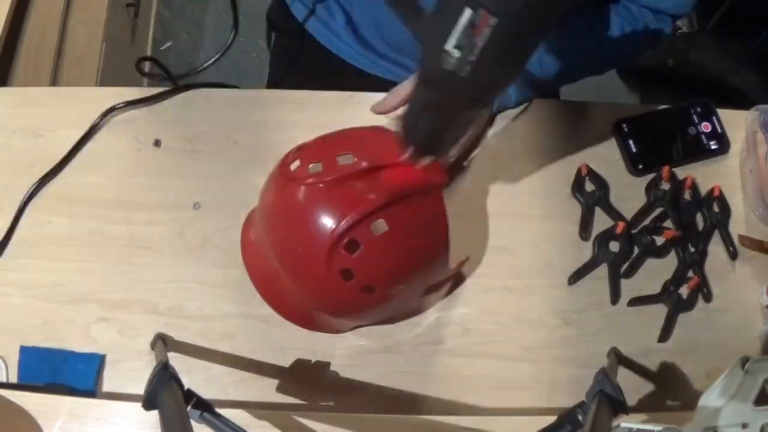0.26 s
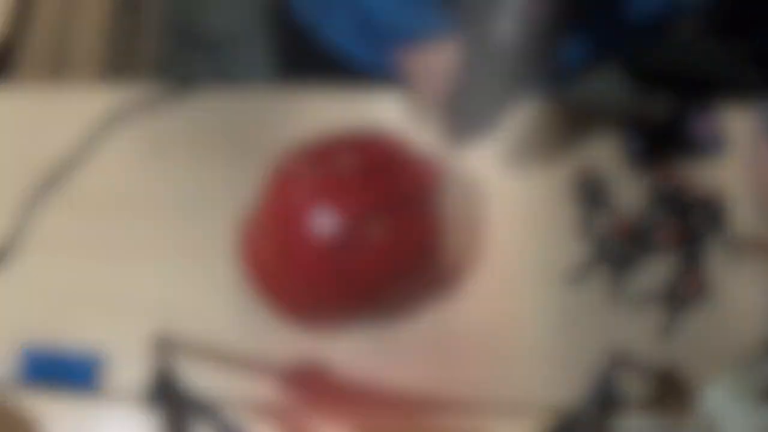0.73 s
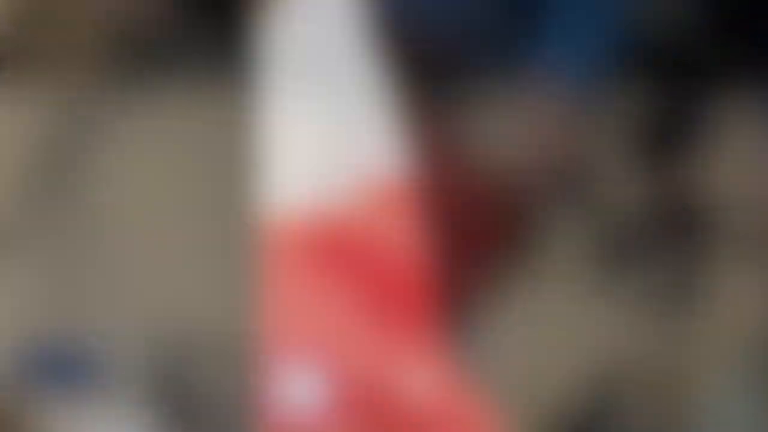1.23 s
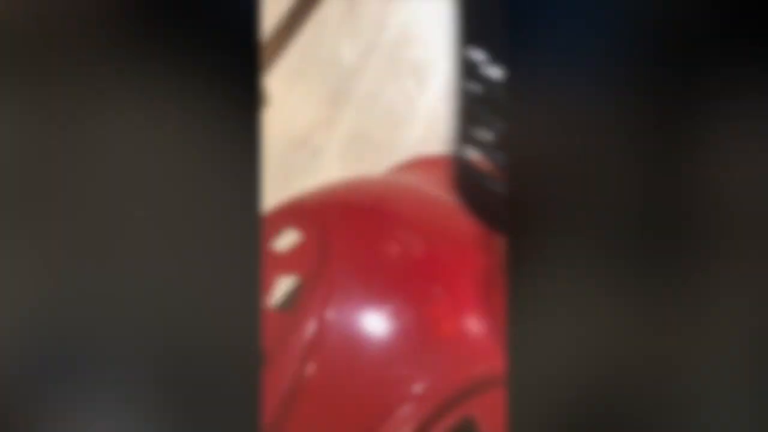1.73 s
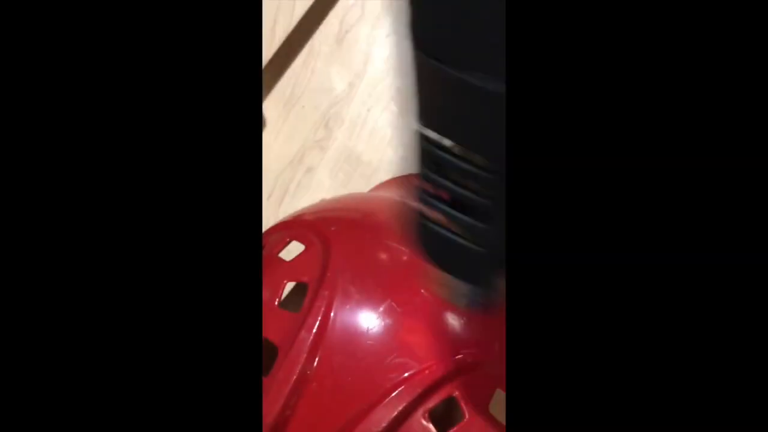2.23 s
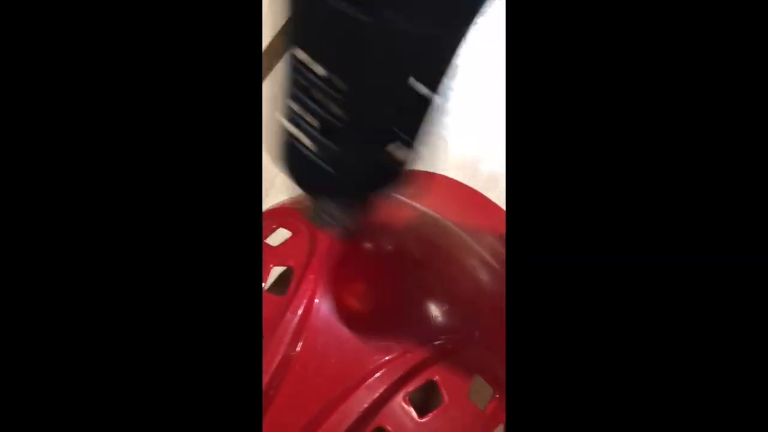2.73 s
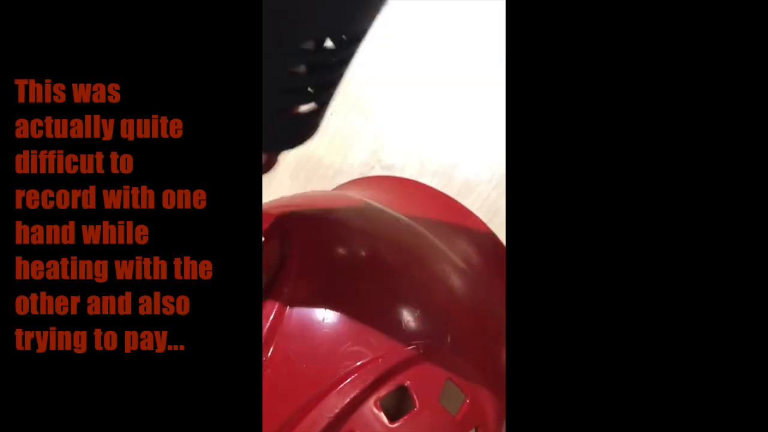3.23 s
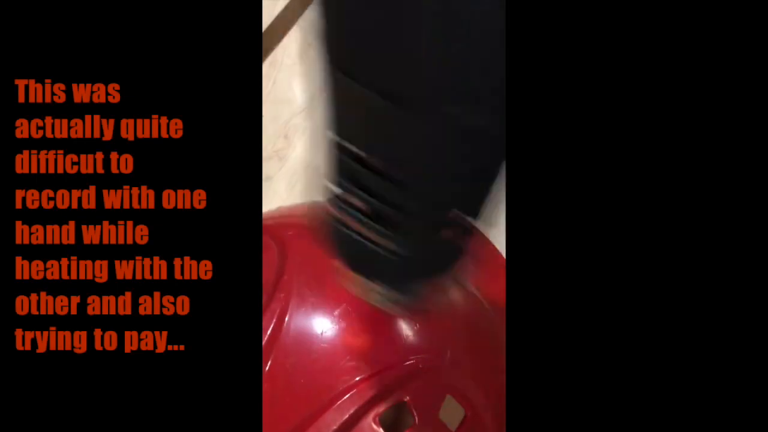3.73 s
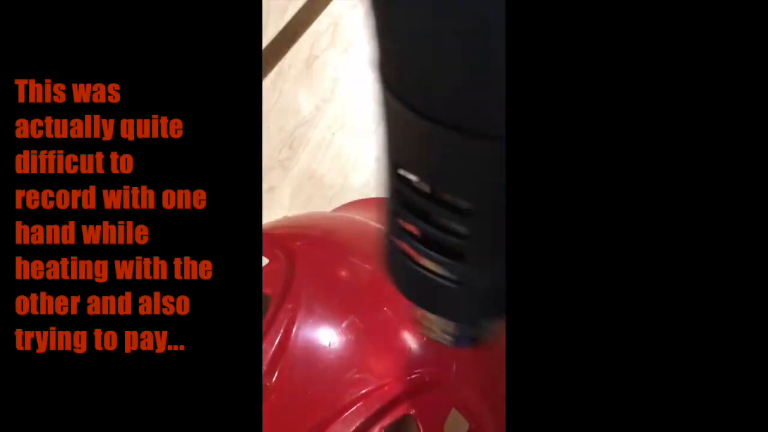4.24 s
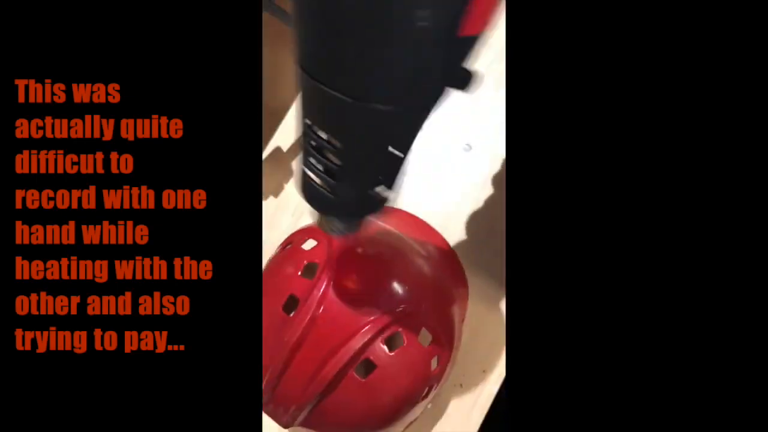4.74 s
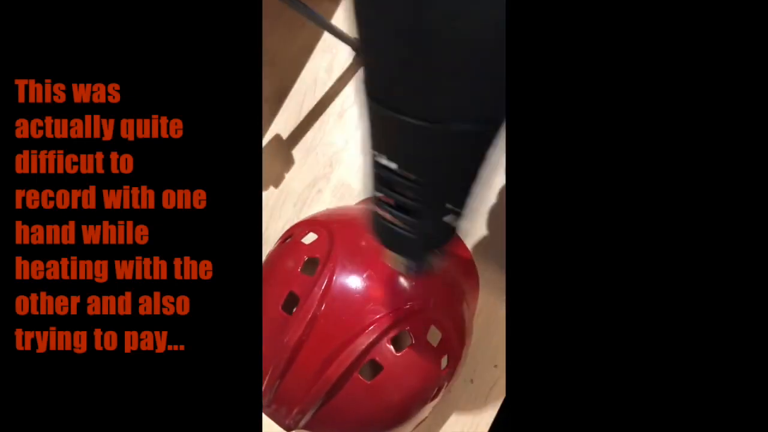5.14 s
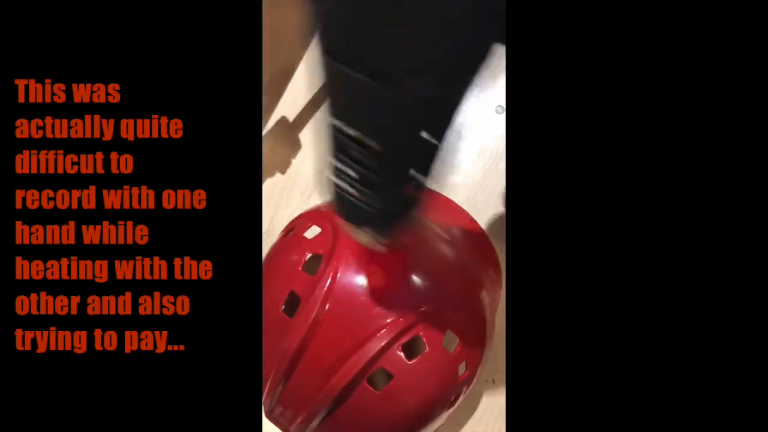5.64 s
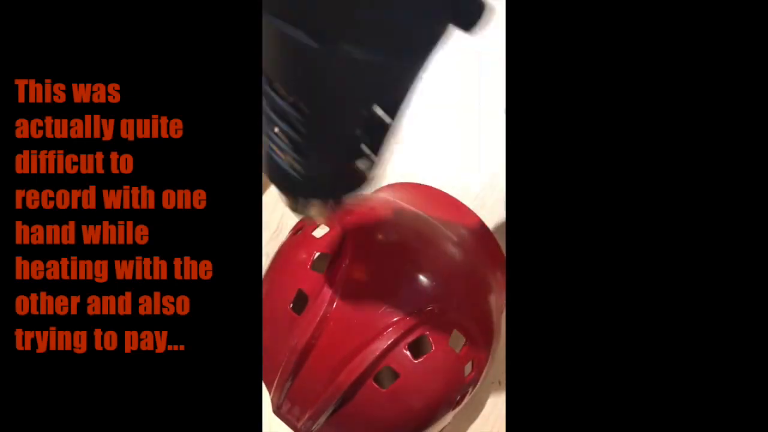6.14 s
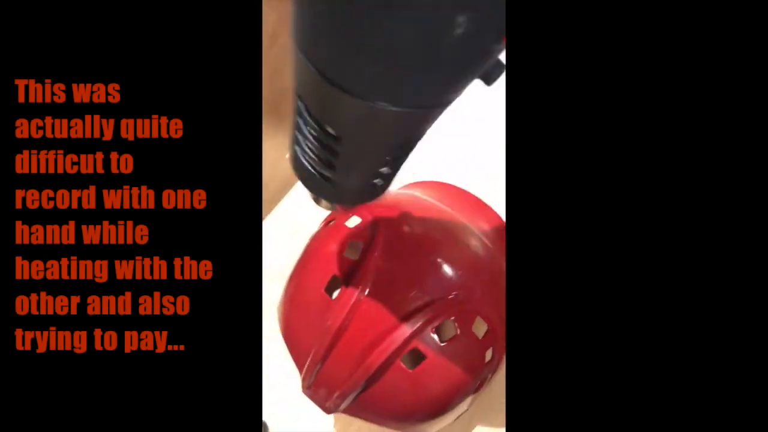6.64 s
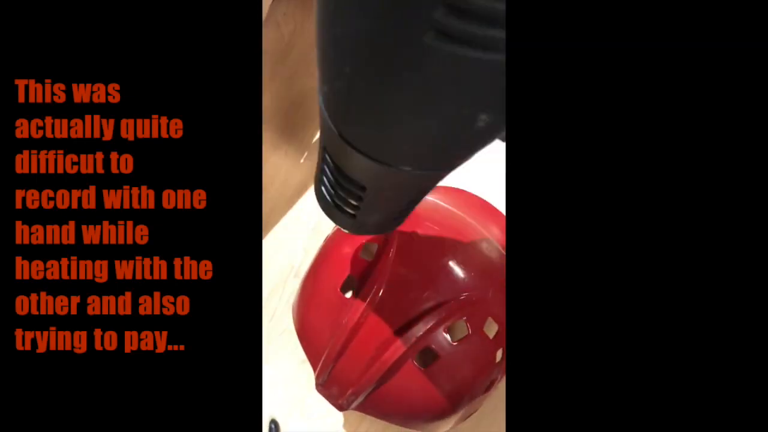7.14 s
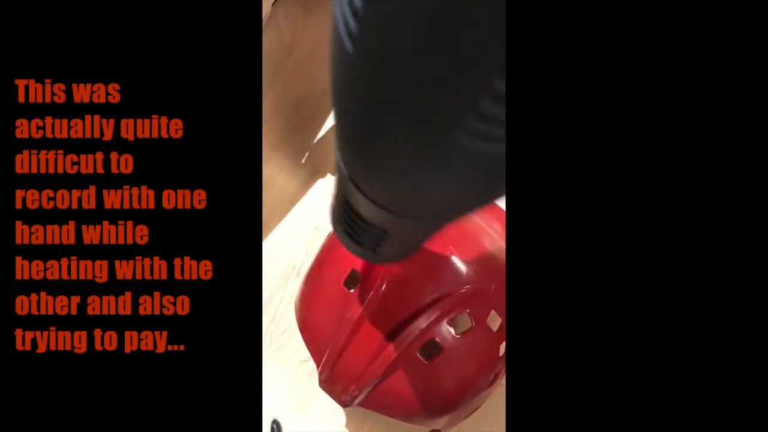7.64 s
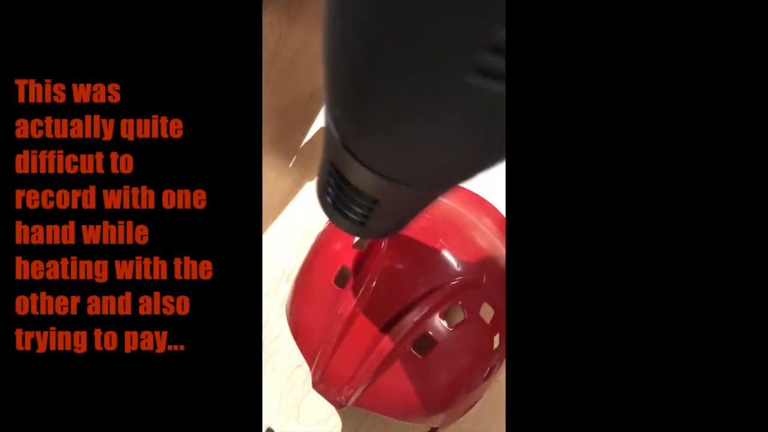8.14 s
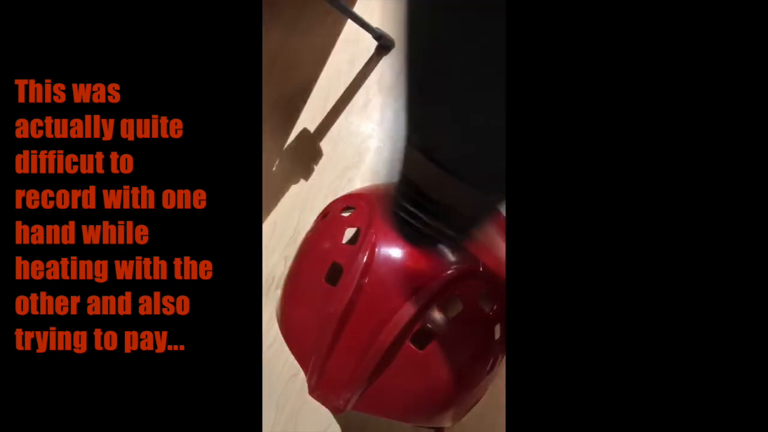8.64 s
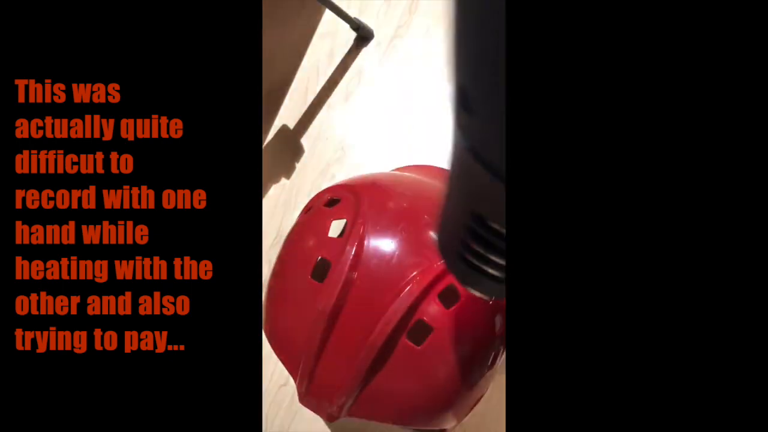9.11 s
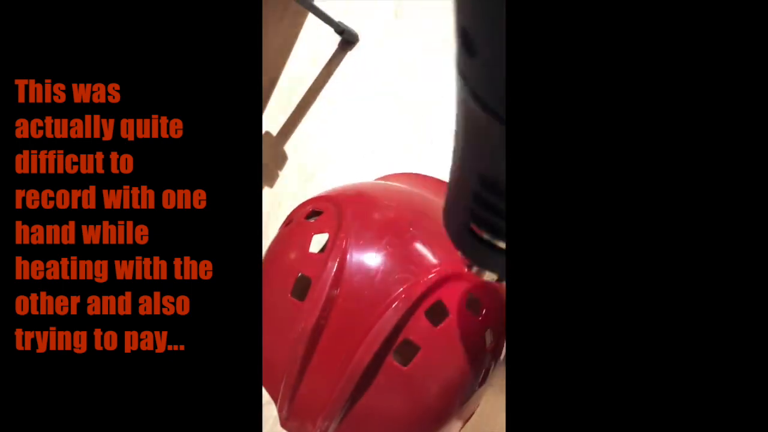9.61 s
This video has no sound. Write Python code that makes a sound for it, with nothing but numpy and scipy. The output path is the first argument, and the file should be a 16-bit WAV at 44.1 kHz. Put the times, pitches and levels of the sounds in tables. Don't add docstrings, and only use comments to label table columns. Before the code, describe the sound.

Sped-up airy hissing gives way to a heat gun blowing up close, its motor hum and rushing air wavering gently over plastic.

```python
import sys
import numpy as np
from scipy import signal
from scipy.io import wavfile
from scipy.ndimage import uniform_filter1d

SR = 44100
rng = np.random.default_rng(int(sys.argv[2]) if len(sys.argv) > 2 else 0)


def gain_from_db(level_db):
    decades = np.asarray(level_db, float) / 20
    return 10 ** decades


def unload_wav(signal):
    wavfile.write(
        sys.argv[1],
        SR,
        np.round(np.clip(np.atleast_2d(signal).T, -1, 1) * 32767).astype(np.int16),
    )


N = 435266

# time in seconds, distance, tilt, turn, aim (jet square on the shell)
POSE = [(1.51, 0.58, -0.65, .99, -1.6), (2.21, 0.59, 0.22, 0.11, 0.22), (2.91, 0.86, 0.31, 0.046, -0.29),
        (3.61, 0.61, 0.087, -0.0093, .1), (3.96, 0.61, 0.37, -0.19, -0.014),
        (4.66, 0.58, -0.26, 0.049, 0.071), (5.36, 0.45, -0.44, 0.078, 0.18), (5.71, 0.15, -0.65, 0.026, .3),
        (6.06, 0.081, -1.04, -.01, 0.61), (6.76, -.12, -0.26, -0.69, 0.28),
        (7.11, -0.27, 0.041, -0.49, .65), (7.46, -.69, 0.45, -0.17, .99), (8.16, -0.71, 0.21, -0.25, .99),
        (8.51, -0.8, 0.36, .21, .8), (8.86, -0.21, -0.72, -0.13, -0.63), (9.21, -0.54, -0.92, -0.15, -0.95),
        (9.86, -0.012, -1.24, 0.15, -0.8)]
# time in seconds, swings done, shaft speed in Hz, pitch bend of the swing in Hz.
WAVING = [(0, -1, 207.6, 0), (.75, -1, 207.55, .05), (1.01, 0, 207.75, .35), (1.55, 2, 207.5, .48),
          (2.05, 4, 207.62, .35), (2.58, 6, 207.6, .44), (3.14, 8, 207.67, .47), (3.7, 10, 207.67, .44),
          (4.26, 12, 207.75, .32), (4.72, 14, 207.83, .15), (5.48, 17, 207.84, .33), (6.28, 20, 207.98, .4),
          (6.81, 22, 207.87, .25), (7.55, 25, 208.05, .25), (8.31, 28, 208.27, .17), (8.84, 30, 208.32, .3),
          (9.36, 32, 208.4, .26), (9.87, 34, 208.3, .25)]


def evened(x):
    return x / np.sqrt(np.mean(x ** 2) + 1e-20)


def read(points, hz):
    f, value = np.transpose(points)
    return np.interp(np.log(hz + 1), np.log(f + 1), value)


def curve(rows, t):
    s, *columns = np.transpose(rows)
    return np.array([np.interp(t, s, c) for c in columns])


def drift(count, t, top_hz):
    hz = np.geomspace(top_hz / 20, top_hz, 16)
    phase = rng.random((count, 16, 1))
    waves = np.sin(2 * np.pi * (hz[:, None] * t + phase))
    return evened((waves / np.sqrt(hz)[:, None]).sum(1))


def noise(spectrum, change_db, patchy_db, size=N):
    window, hop = 1024, 256
    t = np.arange(size // hop + 5) * hop / SR
    hz = np.fft.rfftfreq(window, 1 / SR)
    real, imag, patches = rng.standard_normal((len(t), len(hz), 3)).T
    patches = uniform_filter1d(patches, size=10, axis=0)
    patches = evened(uniform_filter1d(patches, size=10, axis=1))
    shape = gain_from_db(read(spectrum, hz)[:, None] + patchy_db * patches)
    shape = shape / np.sqrt(np.mean(shape ** 2))
    z = (real + 1j * imag) * shape * gain_from_db(change_db(hz, t))
    return signal.istft(z, nperseg=window, noverlap=window - hop)[1][:size] / 15


def crossed(t):
    start_s, length_s = 0.26, 1.55
    return np.sin(np.pi / 2 * np.clip((t - start_s) / length_s, 0, 1)) ** 2


def tick(start_s, peak_db, length_s, centre_hz, width_hz):
    lead_s = start_s % .01
    t = np.arange(N // 20 + 2000) / SR - lead_s
    edges_hz = [max(centre_hz - width_hz / 2, 300), centre_hz + width_hz / 2]
    band = signal.butter(2, edges_hz, "bandpass", fs=SR, output="sos")
    rattle = evened(signal.sosfilt(band, rng.standard_normal(len(t))))
    attack = np.clip(t / 0.00022, 0, 1)
    decay = np.exp(-(np.maximum(t, 0) / length_s) ** 3)
    knock = gain_from_db(peak_db) / 2 * rattle * attack * decay
    return np.pad(knock, (round((start_s - lead_s) * SR), N))[:N]


def fast_view():
    # frequency in Hz, level in dB per Hz.
    air_spectrum = [(15, -47), (40, -18), (800, -16.5), (1800, -11.5), (2400, -15.5), (3800, -12.5),
                    (5000, -14.5), (8800, -11), (9500, -6), (11000, -3.5), (11800, -9), (12300, -3),
                    (14000, -3.5), (15700, -4)]
    # frequency in Hz, side minus mid in dB.
    side_spectrum = [(60, -15), (110, -9), (200, -14), (380, -12), (700, -13), (1290, -16), (2380, -31),
                     (4400, -28), (8120, -22), (15000, -24)]
    # frequency in Hz, level in dB.
    whistle_rows = [(2756, -71), (5512, -73), (8210, -73), (8269, -72), (10955, -70), (11020, -64),
                    (11149, -71), (12160, -68), (12236, -64), (12705, -70), (13779, -59.5), (14890, -67),
                    (14933, -63), (14971, -69)]
    # start in seconds, peak in dB, length in seconds, centre in Hz, width in Hz.
    tick_rows = [
        (.213, -43, .009, 4500, 6000),
        (.214, -38, .009, 6700, 600),
        (.241, -41, .007, 2000, 900),
        (.243, -43, .005, 3700, 1200),
        (.4723, -38, .007, 3200, 900),
        (.4723, -43, .007, 2000, 900),
        (.4723, -35, .007, 5400, 1100),
        (.4723, -37, .006, 7700, 1200),
    ]
    view_db, tick_side_db = -46, -7
    t = np.arange(2 * SR) / SR
    left_right = np.array([[1], [-1]])

    air = noise(air_spectrum, lambda hz, s: 0 * s, patchy_db=1.4, size=len(t))
    side = noise(air_spectrum, lambda hz, s: read(side_spectrum, hz)[:, None], patchy_db=4.5, size=len(t))

    wobble = drift(1, t, top_hz=25.2)[0]
    swells = drift(len(whistle_rows), t, top_hz=30.2)
    warped_s = np.cumsum(1 + .0003 * wobble) / SR
    whistles = np.zeros(len(t))
    for (hz, db), swell in zip(whistle_rows, swells):
        whistles += gain_from_db(db + 51.5 + 1.5 * swell) * np.sin(2 * np.pi * hz * warped_s)

    blown = gain_from_db(view_db) * (1 - crossed(t)) * (air + whistles + side * left_right)
    blown = np.pad(blown, ((0, 0), (0, N - len(t))))
    mid_ticks = sum(tick(*row) for row in tick_rows)
    side_ticks = sum(tick(*row) for row in tick_rows)
    return blown + mid_ticks + gain_from_db(tick_side_db) * side_ticks * left_right


def shaft_hz(t):
    swings, hz, bend_hz = curve(WAVING, t)
    return hz + bend_hz * np.cos(2 * np.pi * swings)


def swing(t):
    swings, hz, bend_hz = curve(WAVING, t)
    return np.minimum(10 * bend_hz, 1) * np.exp(2j * np.pi * swings)


def motor(turns):
    strong_orders = [1, 3, 4, 5, 6, 7, 8, 9, 10, 11, 12, 13, 15, 16, 19, 21, 22, 24, 25, 30, 34, 35, 36, 37,
                     43, 44, 45, 47, 51, 71]
    # dB at rest, dB per distance, dB per tilt, dB per turn.
    strong_levels = np.array([(-53, -3.6, -1.5, 0.2), (-58.5, 1.5, -1.2, -1.5), (-56, -4.5, -2.5, -7),
                              (-51, -2.5, 1.5, -1), (-45.5, -1.1, 1.4, 0), (-55.5, 0.5, 0, -0.5),
                              (-57.5, -5, 0.5, 2), (-58.5, -5, -4.5, 3.5), (-67.5, -1, -20, -6.0),
                              (-51, -1, -2.5, -4), (-50.5, 3.0, -3.5, -4), (-60, 1, 1, -11),
                              (-68, -16, 7, 10), (-65.5, 3.4, -4, -5.5), (-73, -22.2, -11, 15.0),
                              (-64, -5, -2, 4.5), (-67, -15, 12, -4.0), (-67, -3.0, -2, -3),
                              (-69, 3, 2, -7), (-66.5, -5, 3, -7.0), (-67, -2, -1.6, 2),
                              (-62.5, 7.5, -6.5, -8), (-74, -1, -3, 9), (-64, 2, 0.1, -6),
                              (-76.5, -7, 6, -14), (-62.3, -0.5, 0.5, -6), (-67, 6.5, 14, -2.6),
                              (-72, 3.5, 8, -10), (-59, -1, -1, -2.1), (-67, 3, 1.8, -7)])
    # dB with swing speed, dB with swing position.
    strong_throb = np.array([(.2, .1), (-.5, -.5), (.3, 1.8), (-.3, .7), (-.1, .9), (-.8, .2), (-1.1, .7),
                             (1.3, 1.8), (1.1, 2.6), (-1.3, 3.1), (1.2, 0), (-4.1, 4.1), (-.3, 1.3),
                             (3.6, .2), (.2, .3), (-1.6, -2.1), (-4.2, -3), (-1, -3), (-4, -.5), (-2, .5),
                             (-3.5, -1), (.4, -1.1), (-2.2, -2.4), (-2.4, -2.1), (0, -2.5), (3.2, -.8),
                             (-3.4, -1.8), (-1, -4.5), (.3, .5), (-.8, .2)])
    # frequency in Hz, level in dB.
    weak_spectrum = [(400, -75), (2900, -72), (3700, -68), (4800, -72), (5500, -71), (6600, -77),
                     (8100, -70), (8600, -75), (10200, -71), (11500, -74), (14000, -75.5), (15600, -79)]
    # multiple, change in dB.
    shaded_orders = [(12, -2), (47, 4), (49, 4), (50, 2), (51, -8)]
    t = np.arange(0, N / SR, .01)
    wave, pose = swing(t), curve(POSE, t)
    distance, aim = pose[0], pose[3]
    orders = np.arange(1, 76)

    throb = (wave * np.exp(1j * np.pi * drift(len(orders), t, top_hz=.8))).real
    level_db = read(weak_spectrum, orders * WAVING[0][2])[:, None] + 1.5 - 2.5 * distance
    level_db += 4 * throb + 2 * drift(len(orders), t, top_hz=3)

    strong = np.array(strong_orders) - 1
    waved_db = 1.4 * strong_throb @ [wave.real, wave.imag]
    near_41 = np.exp(-((strong[:, None] - 40) / 5) ** 2)
    waved_db += 7 * near_41 * wave.imag * distance
    posed_db = strong_levels[:, 1:] @ pose[:3]
    level_db[strong] = strong_levels[:, :1] + np.minimum(posed_db + waved_db, 11) + .5

    level_db += 1.2 * np.minimum(orders / 8, 1)[:, None] * drift(len(orders), t, top_hz=30)
    square_on = np.clip((aim - .6) / .25, 0, 1)
    for k, db in shaded_orders:
        level_db[k - 1] += db * square_on

    phases, time = rng.random(len(orders)), np.arange(N) / SR
    shaft, order, out = np.exp(2j * np.pi * turns), 1, np.zeros(N)
    for db, phase in zip(level_db, phases):
        order = order * shaft
        level = np.interp(time, t, np.sqrt(2) * gain_from_db(db))
        out += level * (order * np.exp(2j * np.pi * phase)).real
    return out


def jet():
    # frequency in Hz, level in dB per Hz.
    roar_spectrum = [(18, -70), (30, -41), (155, -19), (200, -18.5), (257, -19), (472, -18), (620, -14),
                     (684, -12), (815, -4.5), (1160, -4), (1230, -5), (1550, -13), (1960, -15.5),
                     (2300, -8), (3200, -21), (4160, -23), (7040, -120)]
    # frequency in Hz, level in dB per Hz.
    hiss_spectrum = [(2800, -30), (3300, -6), (3830, -9), (4090, 0), (4370, -1), (4890, -12.5), (5700, -8),
                     (6340, -6.5), (6760, -11.5), (8200, -12), (10500, -13.5), (11100, -17), (12800, -18.5),
                     (15700, -18)]
    band_centres_hz = [1100, 2300, 4200, 8500, 12000]
    # dB at rest, dB per distance, per tilt, per turn, per aim.
    band_pose = np.array([(-.2, -2.5, 0.34, -0.16, .2), (-.2, -2, -0.77, -0.71, -1),
                          (.1, -0.4, .1, -.3, 1.5), (.3, -2.1, 0.41, -1.1, 0), (1.6, -3.5, 0.56, -1.1, 0)])
    # dB with swing speed, with swing position, with position times distance.
    band_swing = np.array([(0, .3, 0), (.3, .4, 0), (.1, -.7, 1.1), (-.2, -.5, 2.1), (-.6, .2, .5)])
    roar_db, hiss_db = -41, -47.5

    def change_db(hz, t):
        wave, pose = swing(t), curve(POSE, t)
        distance = pose[0]
        bands_db = band_pose @ [1 + 0 * t, *pose]
        bands_db += band_swing @ [wave.real, wave.imag, wave.imag * distance]
        share = np.array([read(list(zip(band_centres_hz, row)), hz) for row in np.eye(len(bands_db))])
        delay_s = .0009 + np.array([.0002, .0001, .0001]) @ pose[:3] + .00002 * wave.imag
        reflected = .25 * np.minimum(hz / 4000, 1)[:, None]
        echo = reflected * np.exp(2j * np.pi * hz[:, None] * delay_s)
        dip_db = -3.5 * np.exp(-((hz - 3000) / 300) ** 2)[:, None] * distance
        return share.T @ bands_db + dip_db + 20 * np.log10(abs(1 + echo))

    roar = gain_from_db(roar_db) * noise(roar_spectrum, change_db, patchy_db=.7)
    hiss = gain_from_db(hiss_db) * noise(hiss_spectrum, change_db, patchy_db=1.1)
    return roar + hiss


def scene():
    close_db = -0.72
    t = np.arange(N) / SR
    turns = np.cumsum(shaft_hz(t)) / SR
    close = gain_from_db(close_db) * crossed(t) * (motor(turns) + jet())
    return fast_view() + close


def roll_off(x):
    return signal.sosfilt(signal.butter(12, 16910, fs=SR, output="sos"), x)


def record(dry):
    low_cut = signal.butter(2, 45, "highpass", fs=SR, output="sos")
    edge = signal.firwin(1023, 15740, window=("kaiser", 10), fs=SR)
    mix = signal.oaconvolve(signal.sosfilt(low_cut, dry), edge[None], "same")
    return roll_off(mix)


dry = scene()
out = record(dry)
unload_wav(out)
```